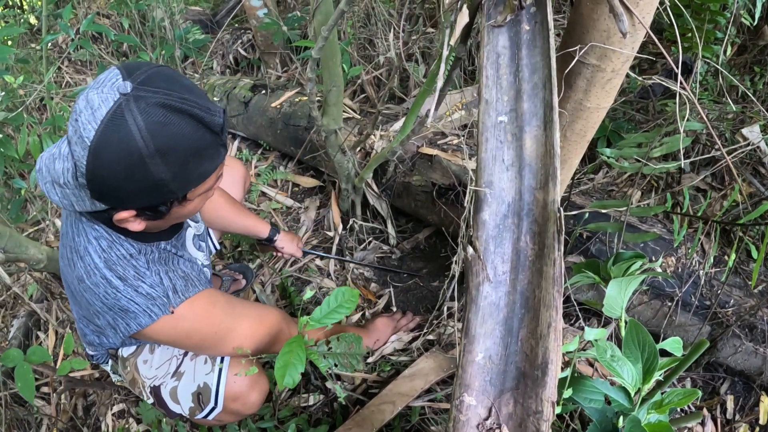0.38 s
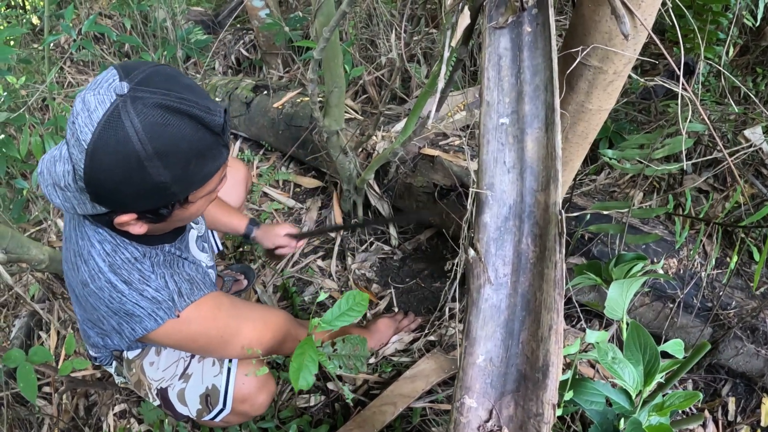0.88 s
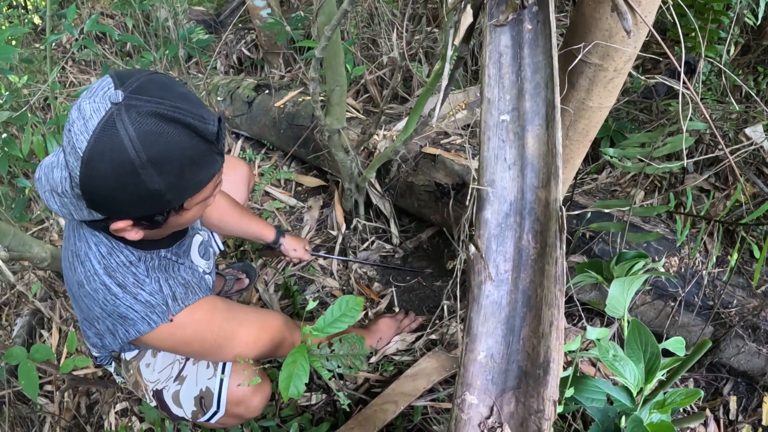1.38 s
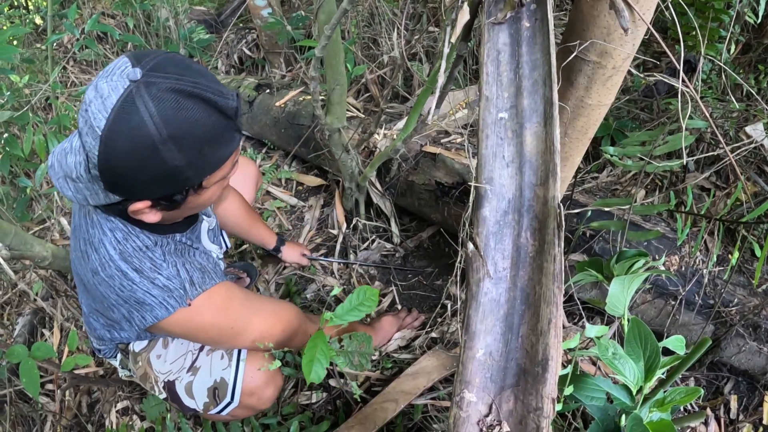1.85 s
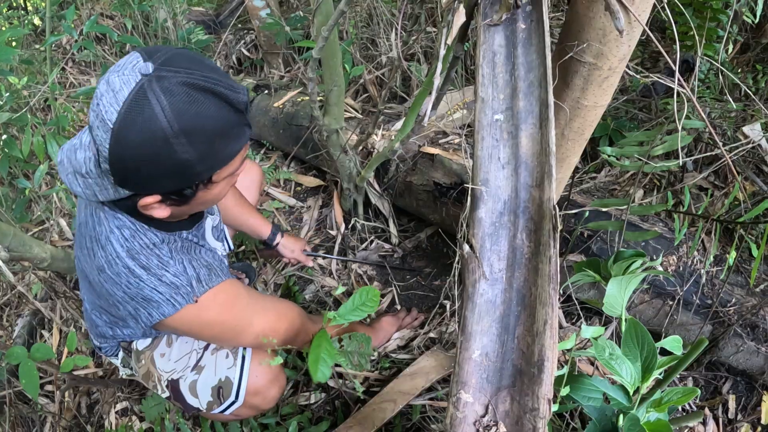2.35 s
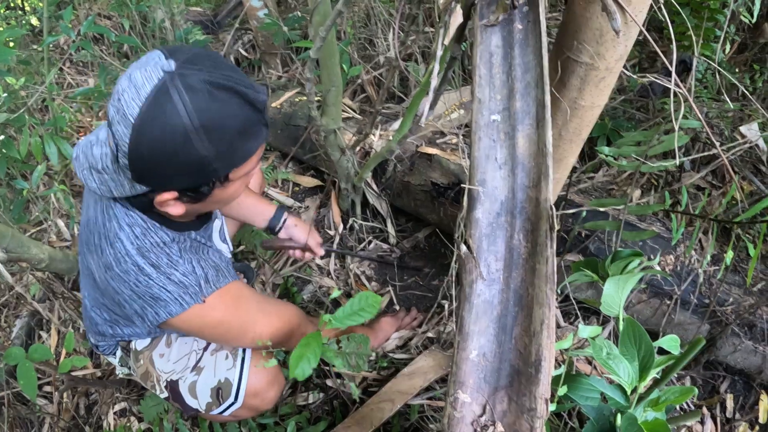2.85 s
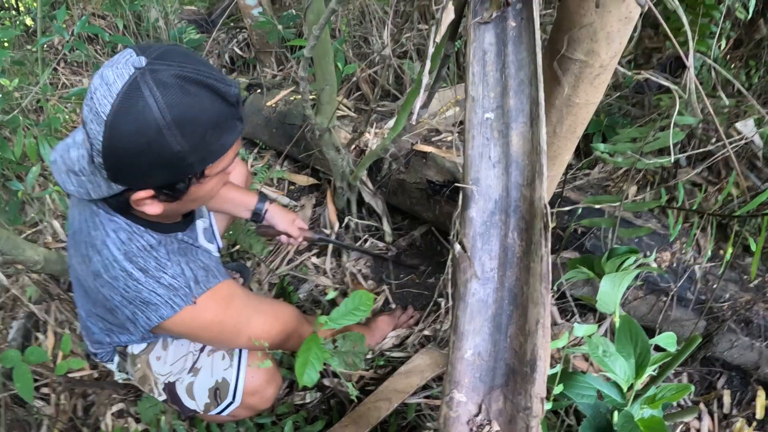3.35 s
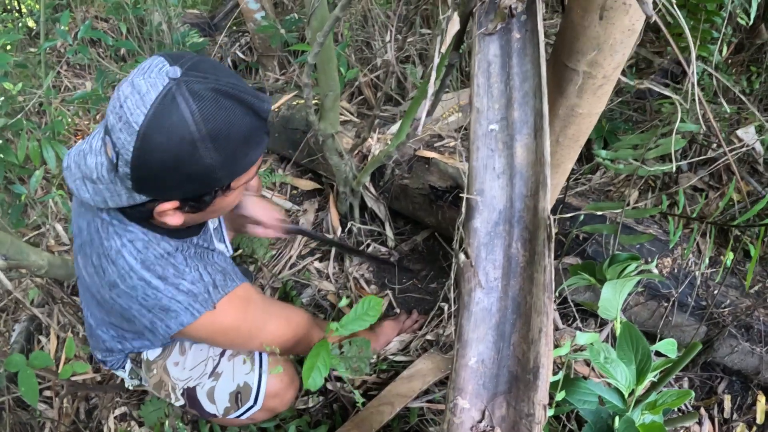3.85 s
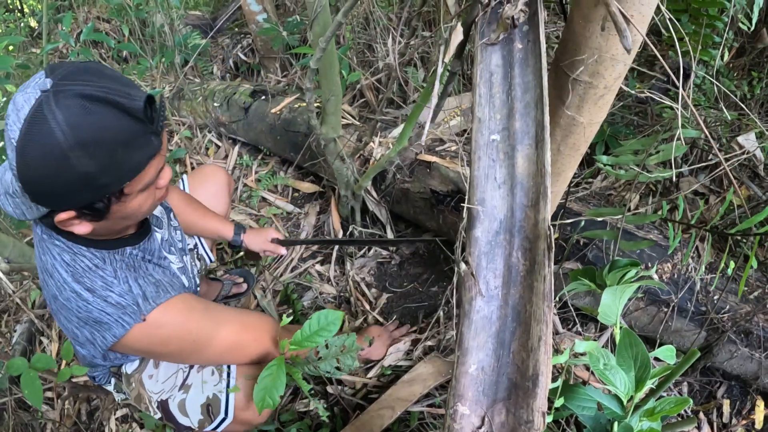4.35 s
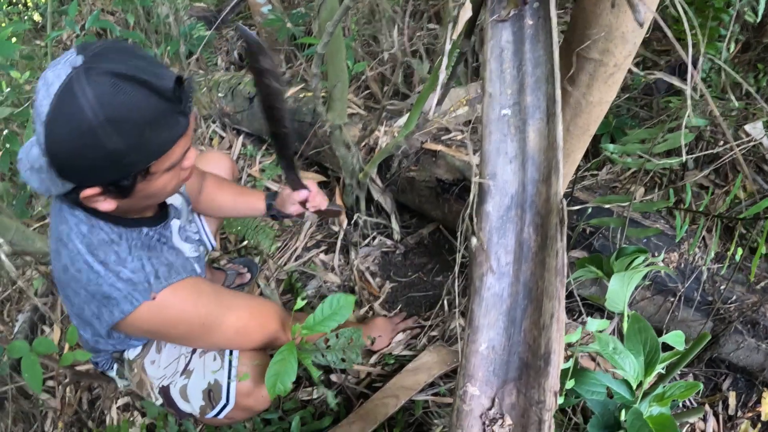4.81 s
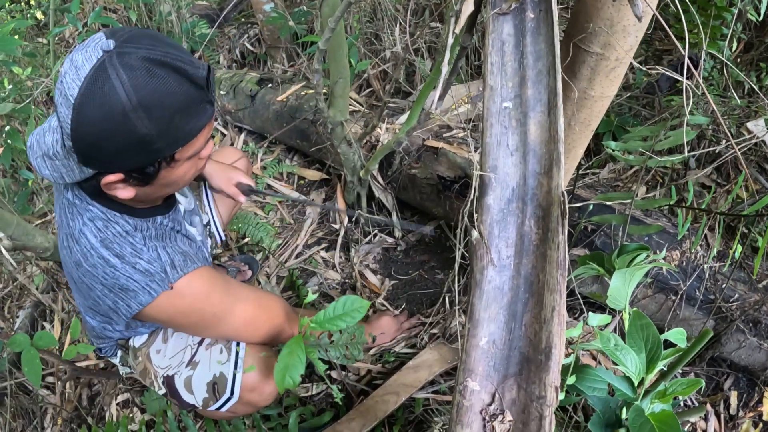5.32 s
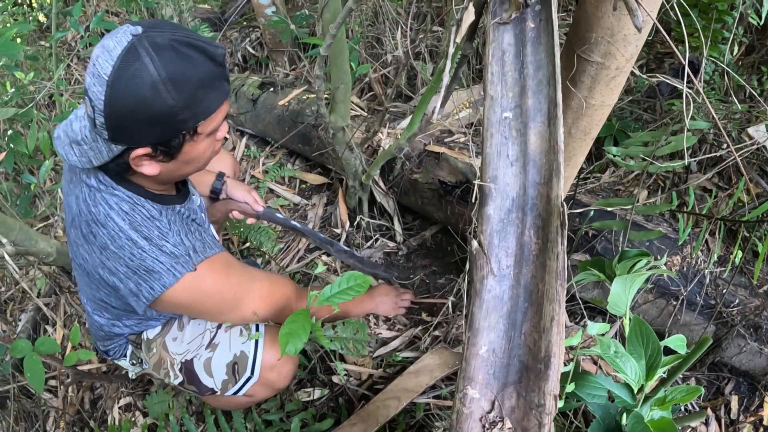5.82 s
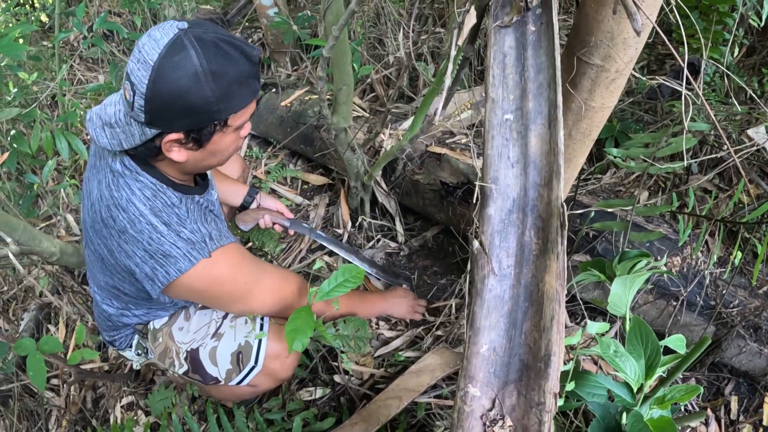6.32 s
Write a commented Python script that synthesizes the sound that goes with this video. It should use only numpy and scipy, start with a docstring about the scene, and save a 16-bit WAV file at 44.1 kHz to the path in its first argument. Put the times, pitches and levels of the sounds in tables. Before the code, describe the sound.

Outdoors, dry and close in stereo, a blade chops rooty ground with sharp cracks and short dull thuds, two blows early and one late. Each sends crumbs of soil and leaves pattering down. Between them come small twig snaps, crackly rustling, wind puffs and a cluster of low handling knocks. Soft distant hums and a throbbing insect shimmer lie beneath; quick warbler phrases grow clearer toward the end.

```python
"""Forest undergrowth, a microphone pair on a camera close to the work; far hums and insects from the start.
A machete chops soil and roots at 0.4, 1.4 and 5.1 s: noise bursts through resonances crack, decaying sines thud.
Twigs snap and litter rustles throughout (noise and ticks); light wind buffets the ports (low noise).
From 1.2 s a warbler and a low falling call (gliding sines) reach us through the trees.
Near 3.4 s the blade is worked loose and the camera jolts (slowing sines); a thin rising call joins at 4 s."""
import sys
import numpy as np
from scipy import signal
from scipy.fft import rfft, irfft, next_fast_len
from scipy.io import wavfile
from scipy.ndimage import uniform_filter1d, map_coordinates

SR = 44100
rng = np.random.default_rng(int(sys.argv[2]) if len(sys.argv) > 2 else 0)


def to_linear_factor(level_db):
    """Convert decibel levels (scalar or array-like) to linear amplitude factors."""
    exponent = np.asarray(level_db, float) / 20
    return 10 ** exponent


def wav_record(signal):
    """Record a signal, one row per channel, as 16-bit PCM in the file named by sys.argv[1]."""
    frames = np.transpose(np.atleast_2d(signal))
    bounded = np.clip(frames, -1, 1)
    # unit amplitude maps onto the largest positive 16-bit level
    quanta = np.round(bounded * 32767).astype(np.int16)
    wavfile.write(sys.argv[1], SR, quanta)


N = 284004

# the blade tearing through stems and roots:
# (time [s], nominal peak [dB], ring [Hz], crack over ring [dB], burst t60 [s])
CUTS = [(.338, -15.5, 3500, -2, 0.054), (.343, -20.5, 2750, -14, 0.11), (0.357, -14.5, 7800, -7.5, 0.025),
        (0.3705, -11.5, 1410, 7, 0.016), (1.413, -32, 6600, 19, 0.044), (1.422, -29, 820, -36, 0.01),
        (1.4307, -20, 1940, 21.5, 0.0031), (1.4322, -3, 1060, 10.5, 0.042), (1.444, -16, 2920, -2, 0.036),
        (5.074, -34, 910, -22, 0.022), (5.0792, -13.5, 1810, -6, 0.0076), (5.0847, -14, 5900, 12, 0.0065),
        (5.087, -7, 2340, 15, 0.026)]
# the loudest twigs and roots to snap: (time [s], nominal peak [dB], ring [Hz], crack over ring [dB])
SNAPS = [(0.485, -34, 2730, 7), (1.489, -27.5, 5760, -7), (1.586, -32.5, 1510, 4), (1.643, -35, 3110, 9),
         (1.673, -34, 3000, -4), (1.687, -29.5, 2800, -8), (1.753, -15, 3000, -31), (1.931, -34, 2840, -19),
         (2.457, -33, 2900, -4), (2.57, -31, 2700, 28), (2.866, -25.5, 980, 8), (2.888, -16.5, 3160, 11),
         (2.963, -36, 3400, -7), (3.013, -32.5, 2680, 2), (3.035, -25, 2860, -1), (3.28, -20, 2800, 10),
         (3.296, -28, 2900, 0), (3.602, -17, 1000, 8), (3.767, -38, 3270, -12), (4.066, -29, 920, 5.5),
         (4.224, -30.5, 2360, 11), (4.228, -27.5, 3270, 2), (5.167, -33.5, 835, 5), (5.402, -28, 2780, 13),
         (5.523, -36, 1370, -3), (5.615, -30, 830, 17), (6.411, -38.5, 7140, -17)]
# colour of a crack: (frequency [Hz], relative level [dB])
CRACK_COLOUR = [(290, -14), (500, -4), (1550, 0), (2770, 5.5), (3980, -3), (6700, -1.5), (7100, -2.5),
                (12000, -13), (16000, -40)]
# the blade stops on a root: (time [s], level before the attack and bass cut [dB])
KNOCKS = [(0.3697, 8.5), (1.442, -1), (5.0846, 1)]
# the blow reaches the soil:
# (time [s], level [dB], signed strength [factor], upper mode over main [dB], main mode t60 [s])
BLOWS = [(.3708, 0, -0.72, -4, 0.054), (1.4459, -10, 0.94, -7, 0.043), (5.0879, -3.5, 0.71, -4, 0.022),
         (5.0985, -4, 0.34, -38, 0.052)]
# modes of soil and root mat, as main, upper, middle, low: (frequency [Hz], t60 over the blow's [ratio])
GROUND_MODES = [(148.2, 0.91), (363, 0.38), (291, 1.3), (79, 1.7)]
# the camera is jolted: (time [s], push level before a 2 dB lift [dB], starting pitch [Hz],
# signed strength [factor], tick over push [dB], push left over right [dB])
JOLTS = [(3.3875, -13.5, 116, 1, -9, -7.5), (3.4227, -22.5, 126, -0.82, -3, 9),
         (3.451, -14, 112, -0.82, -6, -9.5), (3.472, -15.5, 150, 0.98, -2, 10),
         (3.922, -41, 204, 1, -20.5, 1), (4.644, -36, 402, 1, -9, 3.5), (4.704, -31, 220, 1, -9, 4),
         (5.057, -19, 59.6, 0.92, -16, 0.5), (5.146, -29, 49.6, 1, -30, 4)]
# litter settling and stirring round the worker:
# (time [s], hiss [dB], soil over hiss [dB], leaf ring over hiss [dB])
LITTER = [(0, -58, -4.5, 1.5), (.21, -62, -4.5, -8), (.26, -56.5, -8.5, 0.5), (.33, -53, -2, -3.5),
          (.42, -57, -4.5, 1), (.7, -59, -4, -0.5), (.9, -57, -3.5, 3), (1.2, -60, -5, 0.5),
          (1.95, -57, -2, 0.5), (2.18, -59, -3.5, 1), (2.6, -55.5, -2.5, 1), (2.95, -56.5, 0, 0.5),
          (3.2, -57, -6, 8.5), (3.34, -58.5, -4, -2.5), (3.88, -61.5, -6, -5), (4.3, -49.5, -2.5, -5),
          (4.6, -55, -0.5, -6.5), (4.85, -55, -1.5, -4.5), (5.26, -59.5, -1, -2.5), (5.75, -58, -3, -1),
          (6.0, -52, -7.5, -4), (6.44, -63.5, -4, 0)]
# soil and leaves raining down after the blade strikes or is pulled free:
# (time of fullest fall [s], hiss [dB], t60 [s])
SHOWERS = [(.38, -49.5, 1.07), (1.455, -47, 0.75), (3.392, -50, 2.3), (3.93, -52.5, 2.4),
           (5.1, -48.5, 0.55), (5.31, -46.5, 1.45)]
# colour of crumbling soil: (frequency [Hz], relative level [dB])
SOIL_COLOUR = [(300, -5), (500, -2), (800, -6.5), (950, 0.5), (1700, 1), (2600, -6.5), (5000, -24.5)]
# colour of the dry leaves' hiss: (frequency [Hz], relative level [dB])
HISS_COLOUR = [(2240, -40), (3800, -5), (4080, -5), (6040, -6), (7540, -5.5), (9310, -17.5), (10800, -12.5),
               (13200, -20), (16000, -76)]
# wind on the ports: (time [s], buffet level [dB])
WIND = [(0, -56), (.6, -53.5), (.9, -56), (1.1, -52.5), (1.85, -55.5), (2.3, -54.5), (2.9, -41.5),
        (3.3, -51.5), (4.0, -50.5), (4.9, -56), (5.3, -66), (5.8, -58), (6.44, -55.5)]
# puffs on the ports: (time [s], top level [dB], left over right [dB])
PUFFS = [(1.98, -45, 1.5), (2.42, -40, 0.5), (2.64, -41, 11), (2.73, -36.5, 11), (2.96, -38.5, 5.5),
         (3.13, -36, 3.5), (3.43, -32, 3.5), (5.07, -41, -4.5), (5.16, -39.5, 3)]
# colour of the buffeting: (frequency [Hz], relative level [dB])
BUFFET_COLOUR = [(12, -26), (20, 10), (45, -2.5), (80, -6.5), (130, -15.5), (200, -19), (400, -67)]
# colour of the steady low murmur: (frequency [Hz], relative level [dB])
MURMUR_COLOUR = [(35, -2.5), (60, 2), (167, -5), (351, -14.5), (418, -11), (549, -23.5), (1000, -72),
                 (1300, -52), (2200, -120)]
# far hums: (start [s], end [s], centre [Hz], resonance width [Hz], level [dB])
DRONES = [(.85, 1.32, 95, 10, -56), (2.58, 2.68, 100, 30, -50), (2.68, 3.3, 110, 14, -59),
          (2.25, 3.9, 159, 7, -62), (0, .5, 420, 16, -69), (2.2, 3.1, 420, 16, -68),
          (4.0, 5.6, 420, 16, -72)]
# the insects' mean level: (time [s], level [dB])
INSECTS = [(0, -65), (1, -66), (2, -66), (3.3, -65), (4.4, -67), (5.2, -70), (6.44, -69)]
# the warbler's two phrases, before each song's pace, key and level:
# (time in phrase [s], length [s], start pitch [Hz], end pitch [Hz], level [dB])
PHRASES = [
    [(0, .007, 5500, 4960, -2), (.015, .012, 5420, 5250, -6), (.027, .045, 5430, 5350, -1),
     (.034, .05, 3620, 3700, -14), (.068, .016, 4930, 4700, -5), (.083, .035, 2930, 3010, -2),
     (.116, .018, 3170, 3300, -5), (.128, .015, 2460, 2440, -8)],
    [(0, .008, 5050, 4650, -2), (.015, .014, 4850, 5200, 0), (.03, .06, 5150, 5000, -6),
     (.049, .03, 2490, 2420, -8), (.07, .012, 3600, 3200, -3), (.076, .035, 2290, 2250, 0),
     (.085, .06, 4520, 4520, -9), (.115, .015, 3290, 3450, -7)],
]
# each warbler song: (time [s], phrase [index], start pitch of the phrase's third note [Hz],
# duration [factor], level [dB], low notes over high [dB])
SONGS = [(1.155, 0, 5450, .8, -55, 9), (3.066, 1, 5200, .97, -51, 8), (3.48, 0, 5380, .95, -46, -3),
         (4.456, 0, 5430, 1.001, -40, 2), (5.827, 1, 4920, 1.06, -43, 1), (5.984, 0, 5080, .95, -42, -12)]
# a thin rising call: (time [s], level [dB])
TSEEPS = [(3.97, -60), (4.492, -52.5), (4.999, -51), (5.532, -53), (6.012, -53)]
# a low falling call: (time [s], start pitch [Hz], level [dB])
COOS = [(1.199, 762, -66), (3.901, 1037, -57.5), (4.32, 845, -54), (4.7, 844, -50), (5.15, 880, -56),
        (5.55, 980, -55), (5.61, 833, -60)]
# likeness of the two ports in diffuse sound: (frequency [Hz], correlation [-1 to 1])
ALIKE = [(60, 1), (170, 0.74), (700, 0.6), (1500, 0.85), (3100, 0.4), (4000, 0.61), (5800, 0.98),
         (8300, 0.77), (11400, 0.74), (14000, .35)]
# colour difference of the microphone pair: (frequency [Hz], left over right [dB])
PORT_LEAN = [(60, 0.5), (700, -1), (1550, 0.5), (2700, 3.5), (4000, -0.5), (5800, 0), (8300, 3.5),
             (11400, 4.5), (14000, 3.5)]
# phase difference of the microphone pair: (frequency [Hz], left's lead [rad])
PORT_LEAD = [(60, 0.18), (1030, -0.21), (1550, -0.59), (3100, -0.97), (4000, -1.53), (4800, -0.72),
             (6000, -0.31), (8300, -1.47), (9600, 0.049), (14000, 1)]

SNAP_T60_S = 0.019
TWIGLETS, TWIGLET_HZ, TWIGLET_OVER_HISS_DB = 40, 2900, 13  # small unseen breaks: count, ring, least peak
SCRAPE_DB, SCRAPE_HZ, SCRAPE_T60_S = -22, 600, 0.053  # rub in a jolt, level relative to its tick
SHOWER_RISE_S = 0.034
PUFF_DB_PER_S = 140  # rise and fall
LOW_NOTE_HZ = 4600  # untransposed warbler notes below this count as low
CHATTER_S, CHATTER_DB = .13, -10  # span, loudest level relative to the song
TSEEP_S, TSEEP_FROM_HZ, TSEEP_TO_HZ = .035, 8500, 8700
COO_S, COO_FALL = 0.0565, .94  # length, end pitch over start pitch


def unit(x):
    """Scaled to rms 1."""
    return x / np.sqrt(np.mean(x ** 2) + 1e-20)


def along(points, hz):
    """Interpolates (Hz, value) points on a log frequency axis."""
    f, v = np.transpose(points)
    return np.interp(np.log(hz + 1), np.log(f + 1), v)


def curves(rows):
    """One value per sample for each column after the time."""
    s, *cols = np.transpose(rows)
    return [np.interp(np.arange(N) / SR, s, c) for c in cols]


def wobble(rate):
    """A smooth random curve, rate knots a second."""
    knots = rng.standard_normal(int(N * rate / SR) + 4)
    return map_coordinates(knots, [np.arange(N) * rate / SR])


def filtered(x, response):
    """Multiplies the spectrum of x by a complex response of frequency."""
    n = x.shape[-1]
    m = next_fast_len(n + 8192)
    return irfft(rfft(x, m) * response(np.fft.rfftfreq(m, 1 / SR)), m)[..., :n]


def mode(f, hz, width):
    """A causal resonance."""
    return 1j * f * width / (hz * hz - f * f + 1j * f * width)


def add(track, s, sound):
    """Mixes a sound into a track from time s."""
    k = round(s * SR)
    track[..., k:k + sound.shape[-1]] += sound[..., :N - k]


def spread(pair, gain, alike):
    """Makes two unrelated signals into left and right of a given colour and likeness; rms 1."""
    def matrix(hz):
        turn = np.arccos(np.clip(along(alike, hz), -1, 1)) / 2
        return gain(hz) * [np.cos(turn), np.sin(turn)]
    mid, side = filtered(pair, matrix)
    return unit(np.array([mid + side, mid - side]))


def snaps(hiss_db):
    """Blade cuts and breaking twigs, each from a slightly different side; small ones follow the litter's level."""
    out = np.zeros((2, N))
    place, pitch, size, bright = rng.random((TWIGLETS, 4)).T
    sample = place * (N - 1)
    peak_db = hiss_db[sample.astype(int)] + TWIGLET_OVER_HISS_DB + 6 * size
    twiglets = zip(sample / SR, peak_db, TWIGLET_HZ * (0.905 + .25 * pitch), 18 * bright - 12)
    breaks = [(*row, SNAP_T60_S) for row in SNAPS] + CUTS + [(*row, SNAP_T60_S) for row in twiglets]
    for s, db, hz, treble_db, t60 in breaks:
        sides = to_linear_factor(rng.normal(0, 1) * np.array([[1], [-1]]))
        add(out, s, sides * splinter(db, hz, treble_db, t60))
    return out


def splinter(db, hz, treble_db, t60):
    """A sharp crack and a short run of splinters that ring the broken piece."""
    t = np.arange(2048) / SR
    bits = rng.standard_normal(len(t)) * to_linear_factor(6.9 * rng.standard_normal(len(t)))
    bits = bits * to_linear_factor(-60 * t / max(t60, .001)) * (1 - np.exp(-t / 0.00022))
    ring = filtered(bits, lambda f: mode(f, hz, 0.15 * hz))
    crack = filtered(bits, lambda f: to_linear_factor(along(CRACK_COLOUR, f)))
    sound = unit(ring) + to_linear_factor(treble_db) * unit(crack)
    return to_linear_factor(db) * sound / np.abs(sound).max()


def thuds():
    """The root knocks as a very short sine, then the ground's modes ring briefly."""
    out, t = np.zeros(N), np.arange(SR // 4) / SR
    for s, db in KNOCKS:
        attack = (1 - np.exp(-t / 0.00036)) ** 2
        add(out, s, -to_linear_factor(db - 60 * t / 0.0036) * np.sin(2 * np.pi * 1350 * t) * attack)
    for s, db, way, upper_db, t60 in BLOWS:
        main, upper, middle, low = [to_linear_factor(-60 * t / (t60 * share)) * np.sin(2 * np.pi * hz * t)
                                    for hz, share in GROUND_MODES]
        modes = main + to_linear_factor(upper_db) * upper + to_linear_factor(-21.5) * middle + to_linear_factor(-15.5) * low
        add(out, s, way * to_linear_factor(db) * modes * (1 - np.exp(-t / 0.00087)))
    out = filtered(out, lambda f: (1j * f / (60 + 1j * f)) ** 2)  # the thuds carry little deep bass
    return out * to_linear_factor([[-1], [1]])  # right 2 dB louder


def jolts():
    """A tick, then one push and rebound of the camera's body with a dull rub, felt more by one port."""
    out, t = np.zeros((2, N)), np.arange(SR // 8) / SR
    for s, db, hz, way, tick_db, lean_db in JOLTS:
        sides = way * to_linear_factor(db + 2 + lean_db * np.array([[.5], [-.5]]))
        push = to_linear_factor(-19 * hz * t) * np.sin(2 * np.pi * hz * t / (1 + 0.27 * hz * t))  # the rebound is slower
        add(out, s, sides * push)
        tick = to_linear_factor(tick_db - 60 * t / 0.0041) * np.sin(2 * np.pi * 720 * t) * (1 - np.exp(-t / 0.00026))
        add(out, s - .0015, sides[::-1] * tick)  # leans to the other port
        noise = rng.standard_normal((2, len(t)))
        rub = unit(filtered(noise, lambda f: mode(f, SCRAPE_HZ, 1.8 * SCRAPE_HZ) ** 2))
        add(out, s, sides * rub * to_linear_factor(SCRAPE_DB + tick_db - 60 * t / SCRAPE_T60_S))
    return out


def rustle():
    """Crumbling soil, dry leaves that ring near 3 kHz, their hiss, and falling crumbs."""
    soil_db, ring_db, hiss_db = stir()
    leaves = grit(490, 0.73, patchy_db=2.1)
    soil = spread(grit(390, 0.58, patchy_db=2.5), lambda f: to_linear_factor(along(SOIL_COLOUR, f)), ALIKE)
    ring = spread(leaves, lambda f: mode(f, 2940, 1470) ** 2, ALIKE)
    hiss = spread(leaves, lambda f: to_linear_factor(along(HISS_COLOUR, f)), ALIKE)
    return to_linear_factor(soil_db) * soil + to_linear_factor(ring_db) * ring + to_linear_factor(hiss_db) * hiss + to_linear_factor(3.5) * crumbs(hiss_db)


def stir():
    """Soil, leaf ring and hiss levels in dB: slow stirring plus debris showers that swell fast and thin out."""
    hiss_db, soil_over_db, ring_over_db = curves(LITTER)
    t, power = np.arange(N) / SR, to_linear_factor(hiss_db) ** 2
    for s, db, t60 in SHOWERS:
        swell = np.clip(1 + (t - s) / SHOWER_RISE_S, 0, 1)
        power = power + to_linear_factor(db - 60 * np.maximum(t - s, 0) / t60) ** 2 * swell ** 2
    hiss_db = 10 * np.log10(power)
    return hiss_db + soil_over_db, hiss_db + ring_over_db, hiss_db


def grit(rate, share, patchy_db):
    """Ticks of uneven size that come in flurries, over a rush with random patches in time and pitch."""
    flurry = wobble(35)
    struck = rng.random((2, N)) < rate / SR * to_linear_factor(6 * flurry)
    ticks = struck * rng.standard_normal((2, N)) * to_linear_factor(3.0 * rng.exponential(size=(2, N)))
    rush = rng.standard_normal((2, N)) * to_linear_factor(2 * flurry)
    z = signal.stft(share * unit(ticks) + rush, nperseg=256)[2]
    patches = uniform_filter1d(rng.standard_normal(z.shape[1:]), size=5, axis=0)
    patches = uniform_filter1d(patches, size=12, axis=1)
    return signal.istft(z * to_linear_factor(patchy_db * unit(patches)), nperseg=256)[1][:, :N]


def crumbs(stir_db):
    """Single grains of a few cycles; more stir, more grains."""
    keep, place, pitch, size = rng.random((6000, 4)).T
    start = (place * (N - 200)).astype(int)
    heard = keep < to_linear_factor(1.5 * (stir_db[start] - stir_db.max()))
    k = np.arange(160)
    cycles = (1800 * 5 ** pitch)[:, None] * k / SR  # 1.8 to 9 kHz
    shape = cycles * np.exp(-cycles / 0.93) * np.sin(2 * np.pi * cycles)
    grains = (heard * to_linear_factor(stir_db[start] + 14 * size ** 2))[:, None] * shape
    return np.bincount((start[:, None] + k).ravel(), grains.ravel(), N)


def wind():
    """Lumpy low-noise buffeting on the ports over a steady low murmur."""
    t, half = np.arange(N) / SR, np.array([[.5], [-.5]])
    puffs_db = [db + half * lean_db - PUFF_DB_PER_S * np.abs(t - s) for s, db, lean_db in PUFFS]
    buffet_db = np.maximum(curves(WIND)[0], np.max(puffs_db, axis=0))
    lumps = rng.standard_normal((2, N)) * to_linear_factor(3.6 * wobble(24))
    buffet = spread(lumps, lambda f: to_linear_factor(along(BUFFET_COLOUR, f)), [(30, 0.57), (100, 1.0)])
    murmur = spread(rng.standard_normal((2, N)), lambda f: to_linear_factor(along(MURMUR_COLOUR, f)), ALIKE)
    return to_linear_factor(buffet_db) * buffet + to_linear_factor(-59.5) * murmur


def birds():
    """Gliding, fluttering whistles, heard largely through trees whose moving leaves smear the echo."""
    level, out = to_linear_factor(4.1 * wobble(160)), np.zeros(N)
    flutter = wobble(200)
    for s, length, hz0, hz1, db in calls():
        u = np.linspace(0, 1, max(round(length * SR), 40))
        glide = hz0 + (hz1 - hz0) * u
        pitch = glide + max(0.011 * hz0, 30) * flutter[round(s * SR):][:len(u)]
        add(out, s, to_linear_factor(db) * np.sin(np.pi * u) ** .5 * np.sin(2 * np.pi * np.cumsum(pitch) / SR))
    out = (out * level)[None]
    direct = out * to_linear_factor([[1], [-1]])  # left 2 dB louder
    return direct + to_linear_factor(-2.5) * trees(out * (.7 + .7 * wobble(300)), 0.62, 0.0026)


def calls():
    """Notes of three birds as (s, length s, start Hz, end Hz, dB); fainter falling chatter joins each phrase."""
    notes = [(s, TSEEP_S, TSEEP_FROM_HZ, TSEEP_TO_HZ, db) for s, db in TSEEPS]
    notes += [(s, COO_S, hz, COO_FALL * hz, db) for s, hz, db in COOS]
    for s, number, top_hz, pace, db, low_db in SONGS:
        phrase = PHRASES[round(number)]
        key = top_hz / phrase[2][2]
        for at, length, hz0, hz1, note_db in phrase:
            loud_db = db + note_db + low_db * (hz0 < LOW_NOTE_HZ)
            notes.append((s + pace * at, pace * length, key * hz0, key * hz1, loud_db))
        place, drop, size = rng.random((70, 3)).T
        hz = 1.03 * top_hz * (1 - 0.5 * place ** .5 * drop ** 2)
        chatter_db = db + CHATTER_DB - 6 * size
        notes += list(zip(s + CHATTER_S * place, 0.0028 + 0.011 * size, hz, .95 * hz, chatter_db))
    return notes


def trees(x, t60, delay):
    """Scattered echoes of trunks and leaves as decaying noise, different on each side; times in s."""
    t = np.arange(round(t60 * SR)) / SR
    tail = rng.standard_normal((2, len(t))) * to_linear_factor(-60 * t / t60) * (t > delay)
    return signal.fftconvolve(x, tail / np.linalg.norm(tail[0]), axes=1)[:, :N]


def insects():
    """A narrow band of stridulation that throbs about seven times a second."""
    band = spread(rng.standard_normal((2, N)), lambda f: mode(f, 8335, 400) ** 2, ALIKE)
    throb = np.sin(2 * np.pi * np.cumsum(7 + 1.63 * wobble(1.79)) / SR)
    return to_linear_factor(curves(INSECTS)[0] + 2.0 * throb + 2.4 * wobble(3.7)) * band


def drones():
    """Wavering low hums, narrow bands of noise that come and go far away."""
    t, out = np.arange(N) / SR, 0
    for s0, s1, hz, width, db in DRONES:
        band = spread(rng.standard_normal((2, N)), lambda f: mode(f, hz, width) ** 2, ALIKE)
        fade = np.clip(np.minimum(t - s0, s1 - t) / 0.023, 0, 1)
        out = out + to_linear_factor(db) * band * fade
    return out


def scene():
    """Near work with a faint echo, in the forest's background."""
    near = snaps(stir()[2]) + thuds()
    work = near + to_linear_factor(-16.0) * trees(near, 0.2, 0.0036) + jolts() + rustle()
    return work + wind() + birds() + insects() + drones()


def top_cut(x):
    """Nothing passes above the cut-off."""
    return signal.sosfilt(signal.butter(12, 16470, fs=SR, output="sos"), x)


def record(dry):
    """Two close microphone ports differ in colour and phase, and lose the highest treble."""
    half = np.array([[.5], [-.5]])

    def port_response(f):
        colour = to_linear_factor(half * along(PORT_LEAN, f))
        phase = np.exp(1j * half * along(PORT_LEAD, f))
        treble_limit = (f < 15900) / np.sqrt(1 + (f / 14800) ** 16)
        return colour * phase * treble_limit

    finished_mix = filtered(dry, port_response)
    return top_cut(finished_mix)


dry = scene()
out = record(dry)
wav_record(out)
```